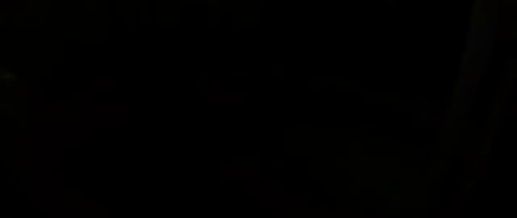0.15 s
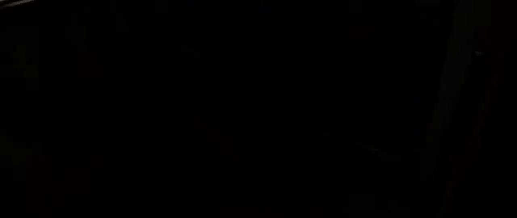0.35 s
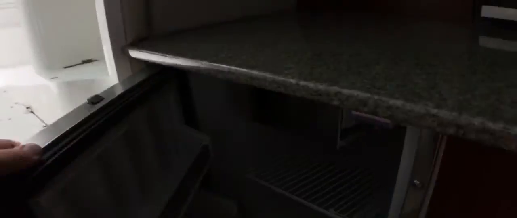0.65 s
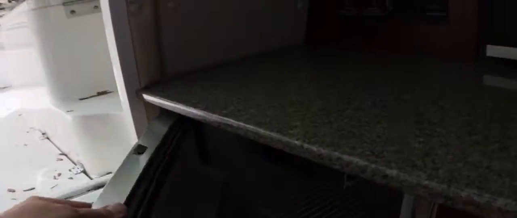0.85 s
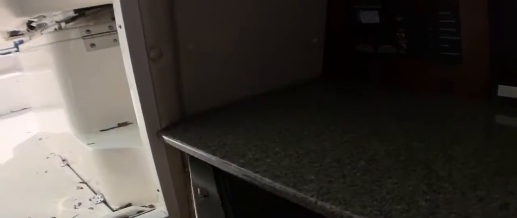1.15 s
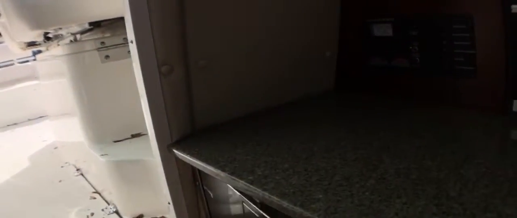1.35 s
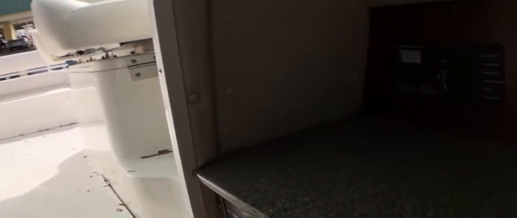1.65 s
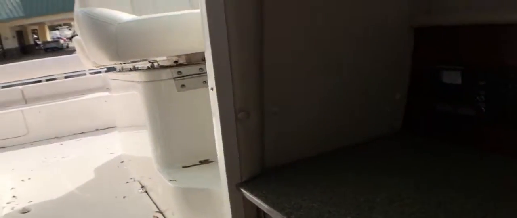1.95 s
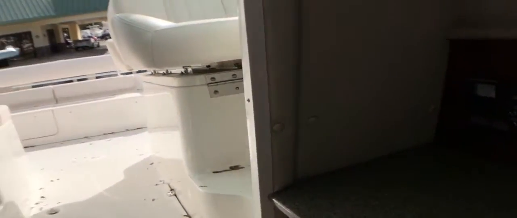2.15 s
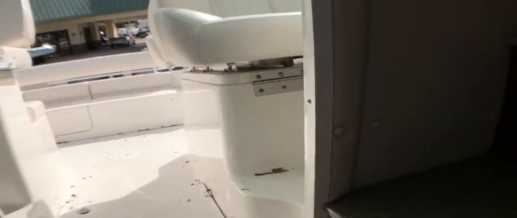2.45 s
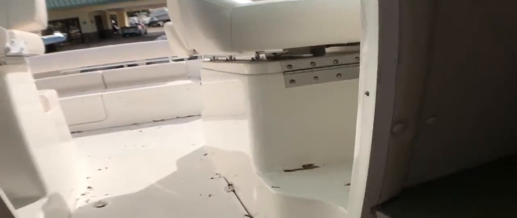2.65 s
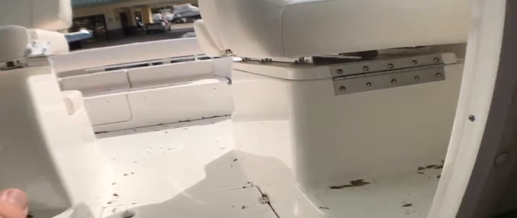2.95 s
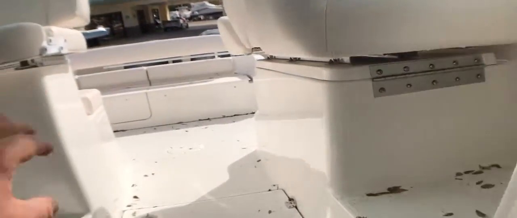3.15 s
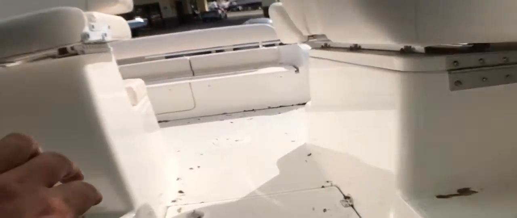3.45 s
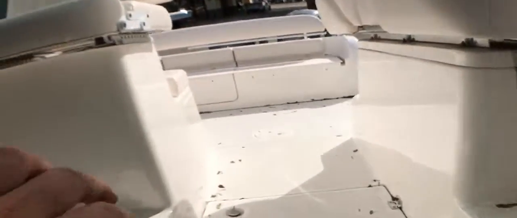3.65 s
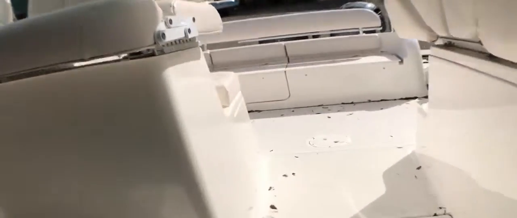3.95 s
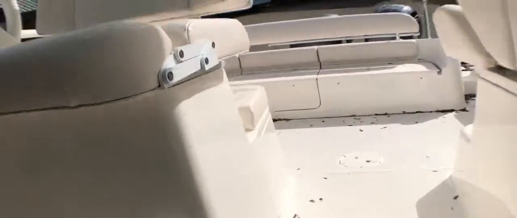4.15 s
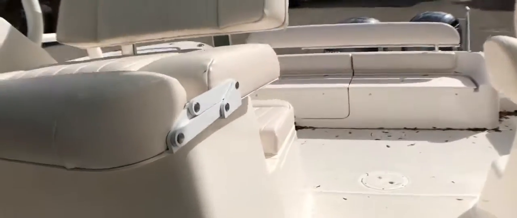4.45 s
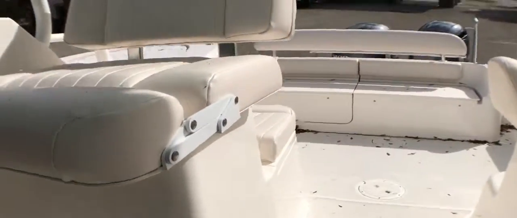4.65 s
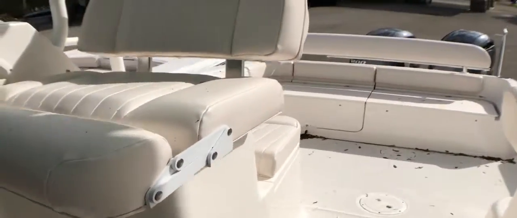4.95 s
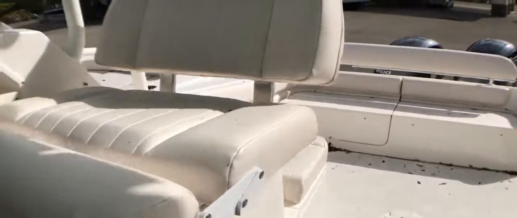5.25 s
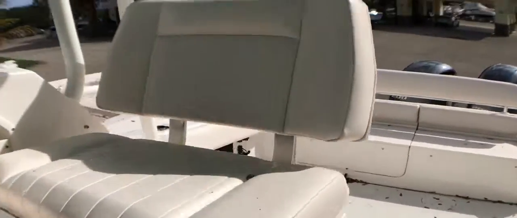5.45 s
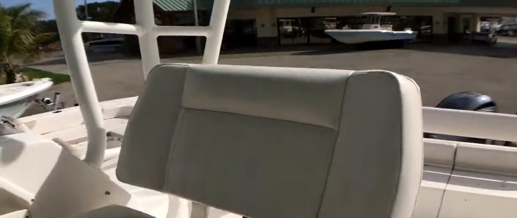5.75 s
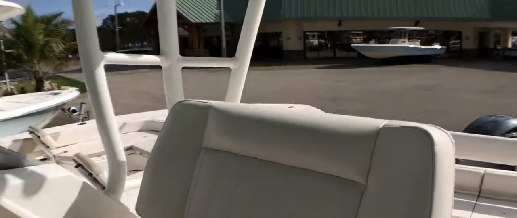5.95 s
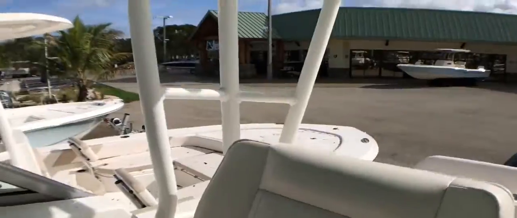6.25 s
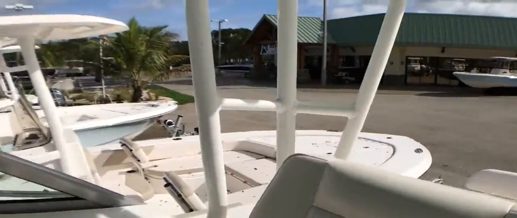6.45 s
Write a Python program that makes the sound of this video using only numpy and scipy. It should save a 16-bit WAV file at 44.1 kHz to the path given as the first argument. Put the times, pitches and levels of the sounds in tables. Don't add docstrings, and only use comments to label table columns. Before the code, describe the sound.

Faint cabin rumble, one hard booming door slam and metallic rattle, then footsteps, a squeaky sole drag and growing traffic noise outdoors.

```python
import sys
import numpy as np
from scipy import signal
from scipy.fft import rfft, irfft
from scipy.io import wavfile
from scipy.ndimage import uniform_filter1d

SR = 44100
rng = np.random.default_rng(int(sys.argv[2]) if len(sys.argv) > 2 else 0)


def amplitude_ratio(level_db):
    exponent = np.asarray(level_db, float) / 20
    return 10 ** exponent


def waveform_to_disk(signal):
    frames = np.transpose(np.atleast_2d(signal))
    scaled = np.clip(frames, -1, 1) * 32767
    samples = np.round(scaled).astype(np.int16)
    wavfile.write(sys.argv[1], SR, samples)


N = 291501

# time_s, level_db
ROAD_LEVEL = [
    (0, -49.5),
    (1.0, -49),
    (2.2, -47),
    (3.2, -45),
    (3.75, -46.5),
    (4.1, -42),
    (5.0, -40),
    (5.6, -39),
    (6.61, -36),
]


def evened(x):
    return x / np.sqrt(np.mean(x ** 2) + 1e-20)


def flutter(count, size):
    return evened(uniform_filter1d(rng.standard_normal(count), size=size))


def read(points, hz):
    f, value = np.transpose(points)
    return np.interp(np.log(hz + 1), np.log(f + 1), value)


def add(mix, s, sound):
    part = mix[round(s * SR):][:len(sound)]
    part += sound[:len(part)]


def curve(rows, axis=1):
    rows = np.asarray(rows)
    return np.interp(np.arange(N) / SR, rows[:, 0], rows[:, axis])


def hump(s, width_s):
    return np.exp(-((np.arange(N) / SR - s) / width_s) ** 2)


def swelling(t, swell_s):
    return t / swell_s * np.exp(1 - t / swell_s)


def coloured(x, spectrum, tilt_db=0):
    hz = np.fft.rfftfreq(len(x), 1 / SR)
    gain_db = read(spectrum, hz) + tilt_db * np.log2((hz + 50) / 4000)
    return evened(irfft(rfft(x) * amplitude_ratio(gain_db), len(x)))


def wash(spectrum, size, patchy_db):
    frames, hz = 4 * N // size + 5, np.fft.rfftfreq(size, 1 / SR)
    real, imag, patches = rng.standard_normal((frames, len(hz), 3)).T
    patches = uniform_filter1d(patches, size=10, axis=0)
    patches = evened(uniform_filter1d(patches, size=12, axis=1))
    z = (real + 1j * imag) * amplitude_ratio(read(spectrum, hz)[:, None] + patchy_db * patches)
    return evened(signal.istft(z, nperseg=size, noverlap=3 * size // 4)[1][:N])


def ringing(modes, factor, ring, weight_db, rise_s, stretch=0, size=SR // 3):
    hz, db, t60_s = np.transpose(modes)[:, :, None]
    t = np.arange(size) / SR
    decay = amplitude_ratio(db + weight_db(hz) - 60 * t / (t60_s * ring))
    turns = hz * factor * (t + stretch * 0.014 * (1 - np.exp(-t / 0.012)))
    return (decay * np.sin(2 * np.pi * turns)).sum(0) * (1 - np.exp(-t / rise_s))


def pings(rows, damping=1.7, shake_db=1.2):
    out, t = np.zeros(N), np.arange(SR // 4) / SR
    for peak_s, db, hz, swell_s in rows:
        level = amplitude_ratio(db + shake_db * flutter(len(t), 100)) * swelling(t, swell_s) ** damping
        add(out, peak_s - swell_s, level * np.sin(2 * np.pi * hz * t))
    return out


def resonate(x, hz, width_hz):
    turn = np.exp(2j * np.pi * np.cumsum(hz) / SR)
    r = np.exp(-np.pi * width_hz / SR)
    return 2 * (turn * signal.lfilter([1 - r], [1, -r], x / turn)).real


def road_roar():
    # pitch_hz, level_db (per Hz)
    cabin = [(88, -53), (150, -9), (167, -17), (214, 3.5), (315, -14.5), (351, -2.5), (508, -8.5),
             (702, -6), (770, -6), (832, -5.5), (1100, -8.5), (1450, -12.5), (6000, -36), (7800, -48),
             (13200, -120)]
    # pitch_hz, level_db (per Hz)
    deck_air = [(88, -36), (150, -5.5), (178, 1.5), (228, 1), (456, -12.5), (621, -4.5), (986, -5.5),
                (1380, -10.5), (2000, -16), (2860, -24.5), (3550, -24.5), (4910, -36), (6000, -31.5),
                (7800, -50), (13200, -120)]
    # time_s, open_air_share (0-1)
    doorway = [
        (0, 0.08),
        (3.3, 0.05),
        (4.1, 0.93),
        (6.61, 0.93),
    ]
    outside = np.clip(curve(doorway), 0, 1)
    roar = np.sqrt(1 - outside) * wash(cabin, size=1024, patchy_db=0.9)
    roar += np.sqrt(outside) * wash(deck_air, size=1024, patchy_db=0.92)
    return amplitude_ratio(curve(ROAD_LEVEL) + 1.5) * roar


def air_hiss():
    # pitch_hz, level_db (per Hz)
    hiss = [(1470, 1), (2500, 1), (3260, 0.5), (4950, -4.5), (6300, -4.5), (9220, -7), (10600, -8.5),
            (13200, -9), (15200, -13.5), (16000, -11.5)]
    # time_s, depth_db, width_s
    shades = [
        (0, -3.5, 0.098),
        (2.6, -5.5, 0.35),
        (3.55, -19, 0.18),
    ]
    swell_db = curve(ROAD_LEVEL) - ROAD_LEVEL[0][1]
    shade_db = sum(db * hump(s, width_s) for s, db, width_s in shades)
    return amplitude_ratio(-58 + 0.37 * swell_db + shade_db) * wash(hiss, size=512, patchy_db=0.5)


def hull_rumble():
    # pitch_hz, level_db (per Hz)
    hull = [(7, -47), (12, -26), (32, 0.5), (51, 1.5), (71, -3), (100, -4), (122, -7), (140, -13.5),
            (163, -37), (230, -56.5)]
    # time_s, level_db
    loads = [
        (1.7, -38.5),
        (2.6, -42),
        (3.3, -41),
        (3.5, -31),
        (4.32, -34.5),
        (5.0, -40),
        (5.32, -29.5),
        (5.8, -33),
        (6.08, -33.5),
        (6.7, -31.5),
    ]
    swell_db = curve(ROAD_LEVEL) - ROAD_LEVEL[0][1]
    power = amplitude_ratio(-41 + 0.45 * swell_db) ** 2
    power += sum(amplitude_ratio(db) ** 2 * hump(s, width_s=0.18) for s, db in loads)
    return np.sqrt(power) * wash(hull, size=4096, patchy_db=3.0)


def engines():
    # start_s, end_s, from_hz, to_hz, level_db
    drones = [
        (-.1, .68, 110, 120, -48.5),
        (-.1, 1.45, 89, 89, -51),
        (.25, .75, 34, 53, -42),
        (.65, 1.42, 52, 51, -42),
        (1.65, 2.3, 102, 113, -45),
        (1.8, 2.45, 66, 76, -45),
        (2.3, 4.9, 119, 119, -46.5),
        (2.85, 3.45, 82, 82, -47),
    ]
    # time_s, firing_hz, level_db
    pulling = [
        (3.7, 56, -60),
        (4.0, 65, -44),
        (4.55, 72, -42),
        (5.1, 87, -42),
        (5.8, 100, -41),
        (6.61, 110, -39),
    ]
    overtone_db, waver_db, fade_s = -10, 2.0, .1
    t = np.arange(N) / SR

    def waver():
        slow = uniform_filter1d(uniform_filter1d(rng.standard_normal(N), size=3000), size=3000)
        return amplitude_ratio(waver_db * evened(slow))

    phase = 2 * np.pi * np.cumsum(curve(pulling)) / SR
    tones = waver() * np.sin(phase) + amplitude_ratio(overtone_db) * waver() * np.sin(2 * phase)
    out = amplitude_ratio(curve(pulling, axis=2)) * tones
    for start_s, end_s, from_hz, to_hz, db in drones:
        on = np.clip(np.minimum(t - start_s, end_s - t) / fade_s, 0, 1)
        hz = np.interp(t, (start_s, end_s), (from_hz, to_hz))
        out += amplitude_ratio(db) * on * waver() * np.sin(2 * np.pi * np.cumsum(hz) / SR)
    return np.sqrt(2) * out


def cracks():
    # start_s, level_db, tilt_db_per_octave, tail_db, tail_tilt_db_per_octave
    sharp = [(.268, -48, -4, 14.5, -12.5), (1.469, -33, 3, 5, 1.5), (1.506, -26.5, -4, 3, -9.5),
             (1.5121, -16, .5, -9, -1.5), (1.515, -22.5, -6, 1.5, -0.5), (1.657, -33.5, 4, 2.5, 3.5),
             (2.667, -35, 2, -9, 2), (2.754, -47, -3, 0, -8), (2.848, -51, -1.5, -2, 0),
             (3.518, -42, 2, -1, 2), (3.563, -28.5, -6, 1.5, -8.5), (5.1316, -21, 3.5, -15, 1),
             (5.134, -27, 2.5, -11, -2), (5.1739, -31, 3, -9, 3), (5.757, -37, -1, 15.5, -15),
             (5.772, -44, -5, 12, -12)]
    # start_s, level_db, tilt_db_per_octave
    ticks = [(2.655, -45, 4), (3.476, -44.5, -8), (3.666, -55, 7), (3.697, -54, -1.5), (3.749, -51, .1),
             (3.786, -47, 1), (3.856, -47, -11), (3.9, -43, -13), (4.63, -52, 2), (5.081, -46, 10),
             (5.099, -37, -8), (5.252, -42, -6)]
    # pitch_hz, level_db
    spectrum = [(300, -44), (900, -3.5), (2000, 0.5), (3800, 2), (5500, -1), (7500, -4.5), (9300, -4.5),
                (12000, -9), (16000, -18)]
    # pitch_hz, level_db, t60_s
    snap_modes = [(2300, -9, .018), (3000, -4, .016), (3600, 0, .02), (4300, -2, .016), (5500, -4, .016),
                  (7000, -9, .012), (8500, -8, .012), (9500, -6, .014), (11800, -13, .01),
                  (13500, -12, .01), (15000, -13, .01)]
    out, t = np.zeros(N), np.arange(SR // 4) / SR
    rows = [(*row, 0.16) for row in sharp]
    rows += [(s, db, tilt_db, -3, tilt_db / 2 - 1.5, 0.06) for s, db, tilt_db in ticks]
    for s, db, tilt_db, tail_db, dull_db, t60_s in sorted(rows):
        grit, bright, dull = rng.standard_normal((3, len(t)))
        spot_db = 2.0 * rng.standard_normal((len(snap_modes), 1))
        snap = ringing(snap_modes, rng.uniform(0.93, 1.03), 0.7,
                       lambda hz: spot_db + tilt_db * np.log2(hz / 4000), rise_s=1e-4, size=2048)
        add(out, s, amplitude_ratio(db - 4.5) * snap)
        tail = amplitude_ratio(-60 * t / (0.82 * t60_s)) * coloured(bright, spectrum, dull_db - 1.0)
        tail += amplitude_ratio(-60 * t / t60_s) * coloured(dull, spectrum, dull_db - 3.5)
        tail *= amplitude_ratio(tail_db + 1.0) * (1 - np.exp(-t / 0.00047))
        burst = np.exp(-t / 0.0017) * coloured(grit, spectrum, tilt_db)
        add(out, s, amplitude_ratio(db - 4) * (burst + tail))
    return out


def door_leaf():
    # start_s, level_db, pitch_factor, hardness_db_per_octave
    bumps = [(.268, -40, 0.63, 7), (.281, -40, 0.76, 6.5), (.291, -44, 0.55, 11), (1.47, -18.5, 1.02, 2),
             (1.475, -18.5, 1.17, 2.5), (1.488, -26, 1.1, 4), (1.499, -19, 1.04, 2),
             (1.513, -22.5, .99, 12), (1.521, -12.5, 0.94, -1.5), (1.533, -16, .98, 0.5),
             (1.555, -18.5, .97, -1), (1.657, -28.5, 1.01, 5.5)]
    # pitch_hz, level_db, t60_s
    leaf = [(182, -6.5, 0.21), (229, 2.5, .15), (301, 4, 0.12), (399, 3, 0.11), (512, -4.5, 0.099),
            (650, -5, 0.095), (820, -9, 0.092), (1043, -5, .07), (1366, -6.5, 0.047), (1543, -7, 0.06),
            (1720, -7.5, 0.058), (2044, -7, 0.052), (2606, -10, 0.035), (3000, -33, 0.074)]
    # peak_s, level_db, pitch_hz, swell_s
    fittings = [(1.4714, -32, 5650, .0015), (1.473, -38, 4350, .002), (1.472, -32, 2650, .002),
                (1.48, -34, 4220, .002), (1.481, -28, 1290, .002), (1.4814, -31, 2200, .003),
                (1.5122, -13, 3350, .0008), (1.5123, -11, 4150, .0009), (1.5124, -17, 2850, .0008),
                (1.5128, -27, 5000, .0007), (1.5128, -25, 6420, .0007), (1.513, -27, 9000, .0007),
                (1.5138, -32, 12020, .0008), (1.5135, -36, 14000, .0008), (1.518, -22, 2073, .003),
                (1.5178, -29, 5640, .0015), (1.5198, -32, 6630, .0015), (1.5198, -34, 8180, .0015),
                (1.5208, -35, 11890, .0015), (1.522, -22, 3280, .002), (1.5233, -33, 5170, .0015),
                (1.5296, -26, 2540, .0015), (1.53, -25, 2910, .002), (1.5298, -34, 5030, .0015),
                (1.5333, -29, 1500, .002), (1.5343, -32, 3420, .0015), (1.5363, -27, 2150, .002),
                (1.5363, -31, 4480, .0015), (1.537, -29, 2650, .0015)]
    out = pings(fittings)
    for s, db, factor, hard_db in bumps:
        spot_db = 2.5 * rng.standard_normal((len(leaf), 1))
        ring = ringing(leaf, factor, 0.96, lambda hz: spot_db + hard_db * np.log2(hz / 500), rise_s=0.0031)
        add(out, s, amplitude_ratio(db - 11) * ring)
    return out


def latch():
    # pitch_hz, level_db, t60_s
    steel = [(3120, -16, .1), (4260, -7, .14), (4380, -6, .13), (4900, -12, .06), (5335, -6, .17),
             (5700, -4, .05), (6088, 0, .075), (6250, -10, .09), (7160, -13, .06), (8450, -8, .07),
             (8590, -8, .17), (9432, -11, .15), (9588, -8, .16), (9622, -14, .12), (10760, -20, .15),
             (11386, 0, .095), (11550, -10, .05), (12883, -16, .17), (13100, -24, .06), (13980, -5, .05),
             (14945, -2, .085), (15600, -10, .05)]
    # start_s, level_db, loudest_hz, spread_octaves, free_s
    strikes = [(1.469, -32, 5500, 0.11, .03), (1.469, -44, 15500, .1, .025), (1.4805, -24, 5400, .1, .01),
               (1.482, -32, 11300, .08, 0.026), (1.544, -29, 5040, 0.22, .4), (1.546, -36, 9600, 0.1, .4),
               (1.656, -36, 8450, 0.04, .007), (1.657, -30, 14600, 0.59, .4),
               (1.662, -44, 10700, 0.1, .044), (1.658, -36, 6100, 0.07, 0.36), (1.714, -52, 5400, .3, .4)]
    # peak_s, level_db, near_hz, swell_s
    swings = [(1.4715, -42, 8590, .002), (1.485, -40, 8590, .003), (1.49, -44, 9430, .008),
              (1.493, -43, 9588, .008), (1.506, -35, 11386, .004), (1.473, -40, 15600, .004),
              (1.56, -44, 4380, .01), (1.666, -31, 11386, .009), (1.668, -36, 9430, .008),
              (1.669, -36, 9588, .01), (1.67, -46, 3120, .012), (1.672, -45, 4900, .005),
              (1.666, -42, 5700, .005), (1.669, -42, 4380, .003), (1.684, -37.5, 8590, 0.0132),
              (1.684, -41, 4260, .012), (1.686, -39.5, 4380, .012), (1.677, -39, 5335, .013),
              (1.74, -56, 8590, .015), (1.74, -59, 5335, .012), (1.658, -33, 8590, .0015),
              (1.664, -38, 6090, .004), (1.674, -34, 6090, .006), (1.685, -48, 12883, .012),
              (1.704, -52, 6090, .004), (1.718, -52, 6250, .003), (1.712, -53, 14945, .008),
              (1.735, -56, 11386, .012), (1.712, -46, 9622, .008), (1.668, -43, 7160, .004)]
    modes_hz = np.transpose(steel)[0]
    nearest = [(s, db, modes_hz[abs(modes_hz - hz).argmin()], swell_s) for s, db, hz, swell_s in swings]
    out, t = pings(nearest, damping=1, shake_db=2.4), np.arange(SR // 3) / SR
    for s, db, top_hz, spread, free_s in strikes:
        ring = ringing(steel, 1, 1, lambda hz: -6 * (np.log2(hz / top_hz) / spread) ** 2, rise_s=.002)
        chatter = amplitude_ratio(2.4 * flutter(len(t), 120))
        held_db = -3000 * np.maximum(t - free_s, 0)
        add(out, s, amplitude_ratio(db + held_db) * chatter * ring)
    return out


def thumps():
    # start_s, peak_db, pitch_hz, swell_s
    landings = [(1.562, -8.5, 44, 0.0072), (1.604, -17.5, 73.4, 0.0072), (1.646, -20, 34.8, 0.012),
                (1.75, -32, 31.5, 0.055), (3.344, -26, 40.5, 0.025), (3.49, -27, 27, .05),
                (3.597, -24, 54.2, 0.032), (4.215, -18.5, 59.5, 0.01), (4.277, -23, 67.5, 0.01),
                (4.192, -26, 58.5, 0.0092), (5.158, -19, 58.3, 0.0088), (5.284, -19, 68, 0.0076),
                (5.325, -24, 59.6, 0.0099), (5.392, -18, 52, 0.014), (5.76, -23.5, 71, 0.017),
                (6.117, -26, 50, 0.01), (6.161, -24.5, 56.7, 0.015), (6.418, -34, 71.4, 0.013),
                (6.529, -16.5, 67.5, 0.014)]
    # start_s, peak_db, pitch_hz, swell_s
    shudders = [(1.472, -28.5, 482, 0.0054), (1.5175, -13.5, 133, 0.0046), (1.482, -20, 86, 0.008),
                (1.484, -28, 287, 0.0064), (2.6, -38.5, 201, 0.016), (2.666, -36, 230, 0.0089),
                (3.618, -17, 134, 0.0022), (4.172, -36.5, 456, 0.01), (4.184, -25.5, 330, 0.003),
                (5.245, -24, 150, 0.0094), (5.263, -21, 267, 0.003), (5.238, -24, 66, .015),
                (5.372, -34, 350, .005), (5.385, -32, 240, .005), (5.365, -35, 253, 0.0061),
                (5.289, -35, 296, 0.0083), (5.4, -29, 108, 0.011), (5.855, -35.5, 290, 0.01),
                (2.3, -46, 595, .01), (5.746, -24.5, 140, 0.0094), (5.75, -25.5, 334, 0.01),
                (5.765, -22.5, 187.3, 0.025), (5.777, -22, 274, 0.0054), (5.797, -21, 359, 0.012),
                (5.83, -25, 185.5, 0.0092), (5.762, -33.5, 612, 0.011), (5.766, -32, 800, 0.0051),
                (5.77, -33, 975, 0.0068), (5.773, -27.5, 418, 0.014)]
    out, t = np.zeros(N), np.arange(SR // 4) / SR
    for s, db, hz, swell_s in landings + shudders:
        add(out, s, -amplitude_ratio(db) * swelling(t, swell_s) * np.sin(2 * np.pi * hz * t))
    return out


def slam():
    # start_s, peak_db, final_hz, swell_s, stretch, slackening_s
    wall = (1.5135, -4.6, 37, .0102, 1.65, .016)
    out, t = np.zeros(N), np.arange(SR // 4) / SR
    s, db, hz, swell_s, stretch, slack_s = wall
    turns = hz * (t + stretch * slack_s * (1 - np.exp(-t / slack_s)))
    add(out, s, -amplitude_ratio(db) * swelling(t, swell_s) * np.sin(2 * np.pi * turns))
    return out


def scuffs():
    # start_s, rise_s, fall_s, peak_db, tilt_db_per_octave
    strokes = [(1.6, 0.12, 0.36, -55, 3), (2.17, .11, 0.21, -47.5, -6), (2.31, .04, .08, -49.5, -2.5),
               (2.666, 0.011, .055, -42.5, -.1), (2.74, .018, .04, -57, 4), (2.835, .015, .09, -60, 2),
               (3.08, .124, 0.12, -60, -.5), (4.7, 0.27, 0.15, -50, 3), (5.0, 0.114, .02, -38.5, 1),
               (5.43, .108, .08, -52, -9), (5.735, 0.041, 0.1, -44, -9)]
    # pitch_hz, level_db (per Hz)
    rubbing = [(700, -32), (1300, -14), (2200, 1), (3500, -3.5), (5000, -7.5), (7500, -12.5), (10500, -13),
               (13000, -13), (16500, -28)]
    edge_db = -23
    out, t = np.zeros(N), np.arange(SR // 2 + SR // 10) / SR
    for s, rise_s, fall_s, db, tilt_db in strokes:
        slips = rng.standard_normal((2, len(t))) * amplitude_ratio(1.8 * flutter(len(t), 120))
        bright = 1 / (1.5 + np.exp(-tilt_db))
        rub = np.sqrt(1 - bright) * coloured(slips[0], rubbing, -2.0)
        rub += np.sqrt(bright) * coloured(slips[1], rubbing, 5.6)
        away = np.maximum((rise_s - t) / rise_s, (t - rise_s) / fall_s)
        add(out, s, amplitude_ratio(db + edge_db * away) * rub * np.clip(10 * (1 - away), 0, 1))
    return out


def heel_taps():
    # peak_s, level_db, pitch_hz, swell_s
    taps = [(2.6684, -33, 3700, .0012), (2.6684, -43, 5470, .001), (2.6684, -40, 2710, .0012),
            (2.679, -43, 3400, .0015), (2.68, -42, 2760, .0015), (1.66, -36, 1800, .003),
            (2.68, -43, 820, .003), (3.5182, -44, 6500, .001), (3.5194, -41, 3140, .0015),
            (3.527, -31.5, 1035, 0.0022), (3.5637, -36, 5470, 0.0011), (3.564, -27, 2560, 0.00097),
            (3.5643, -31, 4180, .001), (3.5648, -24, 1465, .0015), (3.5648, -29, 2010, .0015),
            (3.5638, -20, 1300, .0007), (3.588, -41, 2410, .002), (5.776, -30, 732, 0.0031),
            (5.78, -36, 1500, .003), (5.786, -40, 2300, .003), (5.768, -38, 1850, .003),
            (5.783, -20, 345, .002), (5.796, -35, 990, 0.0059), (5.819, -36, 732, .005),
            (5.822, -36, 603, .005), (5.821, -25, 290, .004), (5.839, -35.5, 570, .006),
            (5.872, -30, 120, 0.0078)]
    return pings(taps)


def deck_knocks():
    # start_s, level_db, pitch_factor, hardness_db_per_octave, stretch
    knocks = [
        (3.52, -15.5, 0.603, 0.5, 0.85),
        (3.564, -6, 1.015, 0.5, 0.303),
    ]
    # pitch_hz, level_db, t60_s
    panel = [(125, -3.5, 0.15), (192.8, 0.5, 0.34), (216, 5.5, 0.062), (292, -10.5, 0.14), (381, -17, 0.18),
             (393, -18.5, 0.264), (493, -18, 0.21), (800, -8.5, 0.045), (918, -10.5, 0.039),
             (1383, -23, 0.1), (1790, -18.5, 0.032)]
    out = np.zeros(N)
    for s, db, factor, hard_db, stretch in knocks:
        ring = ringing(panel, factor, 0.71, lambda hz: hard_db * np.log2(hz / 200), 0.0019, stretch)
        add(out, s, amplitude_ratio(db - 3) * ring)
    return out


def sole_drag():
    # peak_s, level_db, pitch_hz, swell_s
    crackle = [(5.076, -38, 3100, .0015), (5.0854, -38, 4440, .002), (5.093, -40, 4310, .0015),
               (5.0953, -36, 1770, .002), (5.0963, -39, 5640, .0015), (5.1008, -33, 3400, .0015),
               (5.1048, -33, 3350, .0015), (5.1048, -34, 4310, .0015), (5.1093, -32, 5600, .0015),
               (5.1322, -28, 9390, .0006), (5.1322, -29, 10160, .0006), (5.1322, -30, 8300, .0006),
               (5.112, -32, 680, .003), (5.136, -35, 1150, .003), (5.138, -35, 650, .003),
               (5.1332, -28, 4650, .0008), (5.1332, -33, 2240, .001), (5.1337, -32, 6550, .001),
               (5.1342, -27, 5430, .0015), (5.1345, -28, 6000, .0012), (5.1377, -34, 2370, .002),
               (5.1397, -31, 3660, .0015), (5.14, -38, 8200, .0015), (5.148, -38, 2370, .004),
               (5.1487, -37, 5860, .002), (5.158, -43, 6000, .0015), (5.1743, -33, 9250, .0006),
               (5.1743, -33, 2280, .0008), (5.1744, -33, 6930, .0006), (5.1744, -33, 5400, .0006),
               (5.1744, -34, 3500, .0006)]
    # start_s, level_db, from_hz, to_hz, length_s
    squeak = (5.11, -28, 2800, 4500, .012)
    grip_s, hold_s, slip_s = 0.1, 0.036, 0.02
    out, t = pings(crackle), np.arange(SR // 5) / SR
    hz = 2900 + 5200 * t
    noise = rng.standard_normal(len(t))
    grip_db = -12 * np.maximum(1 - t / grip_s, 0)
    slip_db = -16 * np.maximum(t - grip_s - hold_s, 0) / slip_s
    bands = resonate(noise, hz, 300)
    bands += 0.61 * resonate(noise, 1.24 * hz, 350)
    bands += 0.37 * resonate(noise, 1.57 * hz, 460)
    add(out, 5.01, amplitude_ratio(-39.5 + grip_db + slip_db) * evened(bands))
    s, db, from_hz, to_hz, length_s = squeak
    glide_hz = np.linspace(from_hz, to_hz, round(length_s * SR))
    add(out, s, amplitude_ratio(db) * np.hanning(len(glide_hz)) * np.sin(2 * np.pi * np.cumsum(glide_hz) / SR))
    return out


def scene():
    surroundings = road_roar() + air_hiss() + hull_rumble() + engines()
    closing = cracks() + door_leaf() + latch() + slam()
    walking = thumps() + scuffs() + heel_taps() + deck_knocks() + sole_drag()
    return (surroundings + closing + walking)[None]


def band_limit(x):
    return signal.sosfilt(signal.butter(12, 16980, fs=SR, output="sos"), x)


def record(dry):
    overload, notch_hz, notch_wide_hz, notch_db, edge_hz = 1.25, 10470, 250, -7, 15900
    hz = np.fft.rfftfreq(N, 1 / SR)
    response_db = notch_db * np.exp(-((hz - notch_hz) / notch_wide_hz) ** 2)
    response_db -= 45 / (1 + np.exp((edge_hz - hz) / 60))
    rounded = overload * np.tanh(dry / overload)
    mix = irfft(rfft(rounded) * amplitude_ratio(response_db), N)
    return band_limit(mix)


dry = scene()
out = record(dry)
waveform_to_disk(out)
```